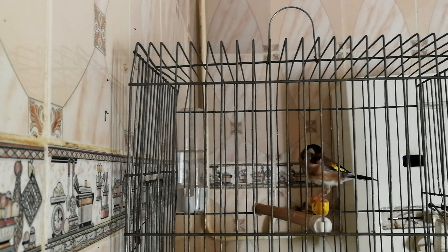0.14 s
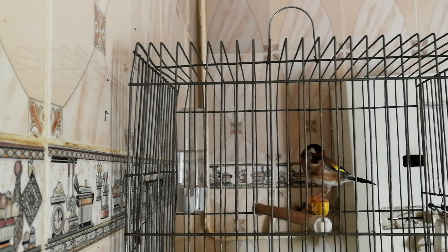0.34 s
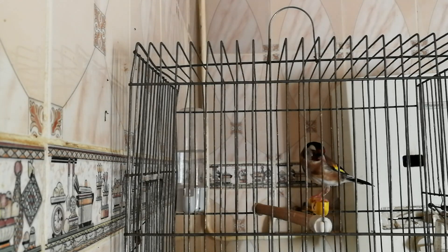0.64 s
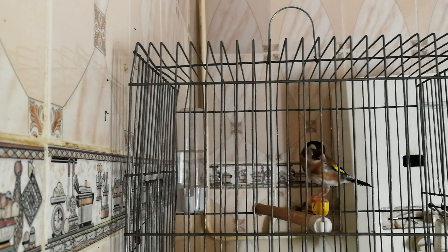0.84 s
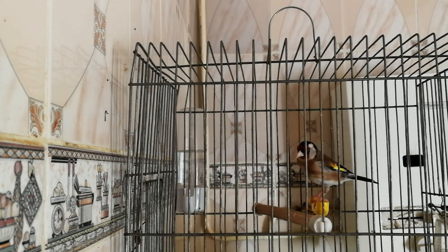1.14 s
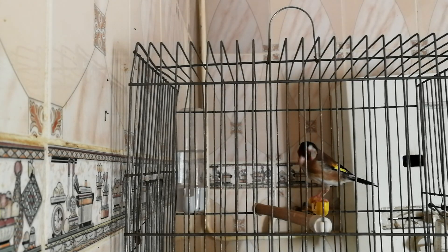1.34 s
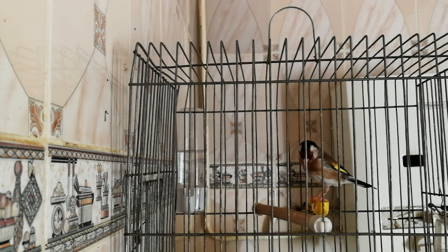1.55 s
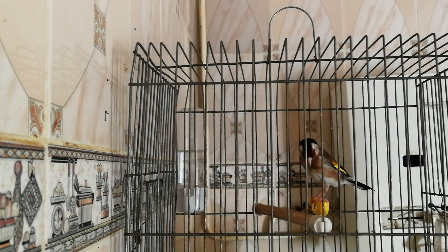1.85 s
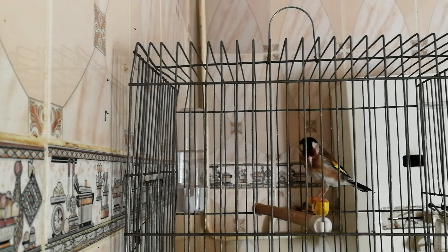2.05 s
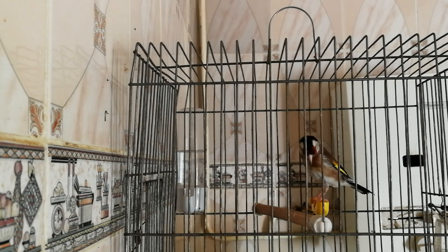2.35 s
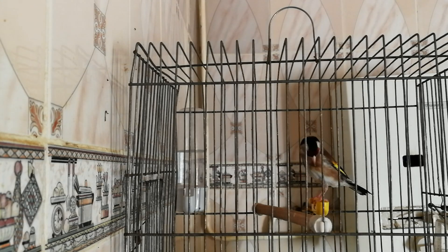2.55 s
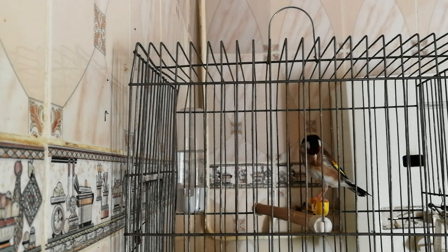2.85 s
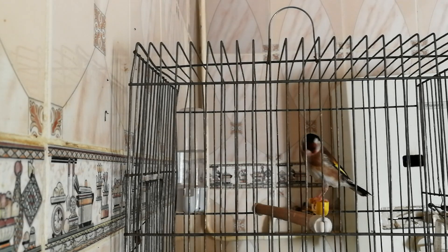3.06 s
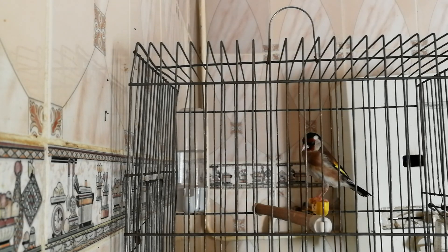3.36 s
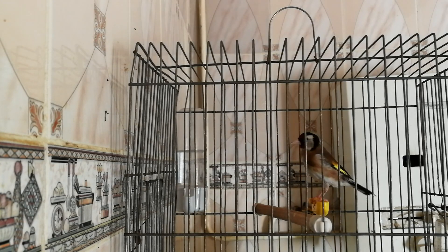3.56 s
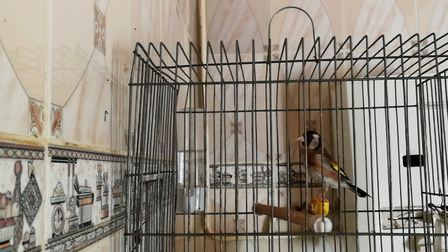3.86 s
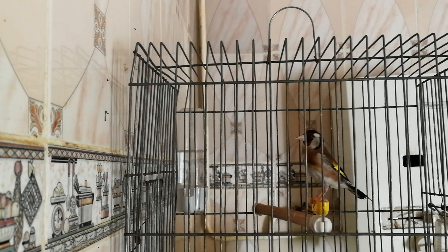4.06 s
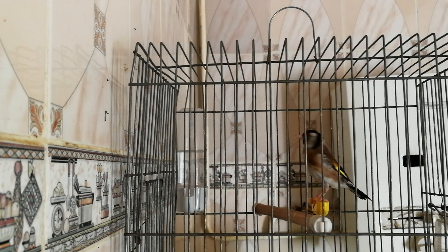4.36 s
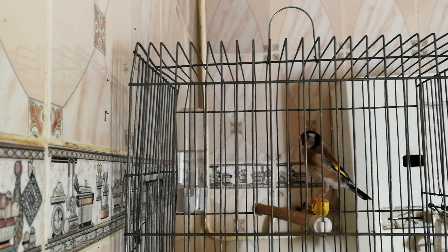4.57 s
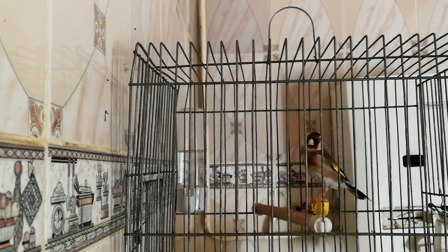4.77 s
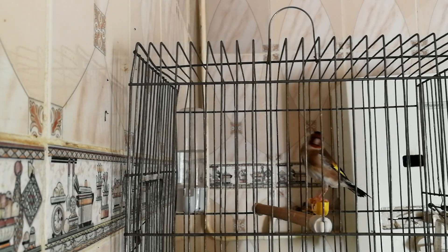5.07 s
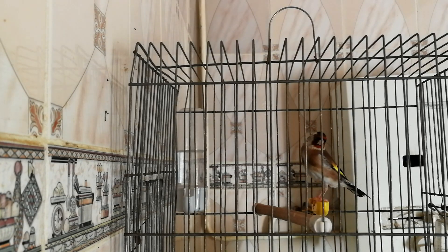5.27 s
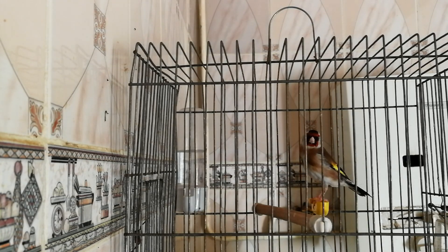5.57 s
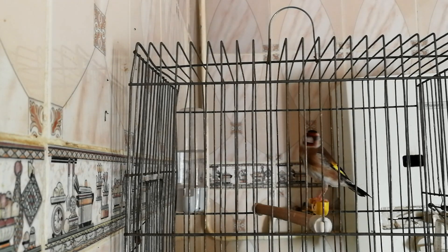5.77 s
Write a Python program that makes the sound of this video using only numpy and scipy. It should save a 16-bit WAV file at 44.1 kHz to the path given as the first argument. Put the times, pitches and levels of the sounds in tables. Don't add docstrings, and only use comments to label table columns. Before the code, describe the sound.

In a small hard tiled room, a distant second bird gives short echoing chirps from the start, strongest around one and a half and two and a half seconds. A caged finch close to the microphone adds one soft rise, then a quick loud cluster of sweeping notes midway and another pair near the end. Feathers rustle softly, claws tick faintly, and a low appliance hum and thin hiss continue underneath.

```python
import sys
import numpy as np
from scipy import signal
from scipy.fft import rfft, irfft
from scipy.io import wavfile
from scipy.ndimage import uniform_filter1d

SR = 44100
rng = np.random.default_rng(int(sys.argv[2]) if len(sys.argv) > 2 else 0)


def file_out(sig):
    cols = np.atleast_2d(sig).T
    lim = np.clip(cols, -1, 1)
    pcm = np.round(lim * 32767).astype(np.int16)
    wavfile.write(sys.argv[1], SR, pcm)


def convert_level_to_amplitude(level_db):
    exponent = np.asarray(level_db, float) / 20
    return 10 ** exponent


N = 261072

FAR_LEAD, NEAR_LEAD = 27, -9


def read(points, hz, column=1):
    table = np.transpose(points)
    return np.interp(np.log(hz + 1), np.log(table[0] + 1), table[column])


def evened(x):
    return x / np.sqrt(np.mean(x ** 2) + 1e-20)


def add(mix, s, sound):
    part = mix[..., round(s * SR):][..., :sound.shape[-1]]
    part += sound[..., :part.shape[-1]]


def resonate(x, hz, width):
    turn = np.exp(2j * np.pi * hz * np.arange(len(x)) / SR)
    r = np.exp(-np.pi * width / SR)
    return 2 * (turn * signal.lfilter([1 - r], [1, -r], x / turn)).real


def resonate_twice(x, hz, width):
    return resonate(resonate(x, hz, width), hz, width)


def whistle(hz, effort_db, overtone_db, breath_db=-27):
    partials_db = [-6, -7, -15, -22]
    # (frequency [Hz], level [dB])
    beak = [(2000, -5), (4000, 3), (5200, -1), (6500, 4.5), (7200, 4.5), (7900, -13), (9000, 5),
            (10500, -2), (12000, 1.5), (13500, -11), (16000, -30)]
    turns = np.cumsum(hz) / SR
    chance = rng.standard_normal((len(partials_db) + 1, 4096))[:, :len(hz)]
    tone = convert_level_to_amplitude(read(beak, hz)) * np.sin(2 * np.pi * turns)
    for k, db in enumerate(partials_db, start=2):
        flutter_db = 1.92 * evened(uniform_filter1d(chance[k - 1], size=60))
        audible = k * hz < SR / 2
        level = convert_level_to_amplitude(db + overtone_db + flutter_db + read(beak, k * hz))
        tone += audible * level * np.sin(2 * np.pi * k * turns)
    hiss = 1.4 * resonate_twice(np.diff(chance[0], prepend=0), 6800, 6000)
    return convert_level_to_amplitude(effort_db) * (np.sqrt(2) * tone + convert_level_to_amplitude(breath_db) * hiss)


def far_bird():
    # (time [s], level [dB], start [Hz], end [Hz], length [s])
    peeps = [
        (.001, -48.5, 3460, 4420, .019),
        (.087, -45.5, 3180, 4200, .014),
        (.54, -55.5, 4980, 3980, .014),
        (.585, -62.5, 4600, 3270, .017),
    ]
    # (time [s], level [dB], end [Hz], length [s], overtone strength [dB])
    chirps = [
        (.142, -50.5, 3010, .025, -17.5),
        (.733, -53, 3010, .024, -10.5),
        (1.566, -56, 3160, .035, -12),
        (1.596, -41, 3170, .03, -19),
        (1.992, -52, 3050, .04, -9),
        (2.551, -38.5, 2820, .014, -19),
        (3.066, -50.5, 3060, .035, -8),
        (4.147, -50, 3070, .015, -16),
    ]
    # (time [s], level [dB], overtone strength [dB])
    slides = [
        (.253, -50, -14),
        (.848, -54, -17),
        (1.691, -52, -13),
        (2.086, -49.5, -27),
        (2.182, -48, -6.5),
        (3.179, -50, -21),
    ]
    # (frequency [Hz], level [dB])
    path = [(3500, -.5), (6000, -2.5), (8000, 4), (10000, -10), (12000, -25)]
    calls = [(s, db, 2375, *rest) for s, db, *rest in chirps]
    calls += [(*peep, -17) for peep in peeps]
    calls += [(s, db, 2100, 3800, .034, over_db) for s, db, over_db in slides]
    out = np.zeros(N)
    for s, db, start_hz, end_hz, length, overtone_db in calls:
        u = np.arange(0, 1, 1 / (length * SR))
        bend = 1.095 + 350 / abs(start_hz - end_hz)
        hz = end_hz + (start_hz - end_hz) * (1 - u) ** bend
        add(out, s, whistle(hz, db, overtone_db) * np.sin(np.pi * u) ** 0.24)
    return irfft(rfft(out) * convert_level_to_amplitude(read(path, np.fft.rfftfreq(N, 1 / SR))), N)


def room(x, build, first, same, lead, livelier):
    # (frequency [Hz], 60 dB decay time [s], level [dB])
    decay = [(1000, 0.17, 7), (2500, 0.39, 0.5), (4000, 0.43, -8), (6500, 0.39, -6), (9260, 0.3, -2.5),
             (14100, 0.16, -2)]
    size = SR * 3 // 4
    echoes = rng.standard_normal((2, size))
    clumps_db = 4.5 * rng.standard_normal((2, size // 32 + 1))
    echoes *= convert_level_to_amplitude(clumps_db).repeat(32, 1)[:, :size]
    echoes[1] = same * np.roll(echoes[0], lead) + np.sqrt(1 - same ** 2) * echoes[1]
    hz, t, z = signal.stft(echoes, SR, nperseg=128)
    fall_db = 60 * t / (livelier * read(decay, hz)[:, None])
    band_db = read(decay, hz, column=2)[:, None]
    tail = signal.istft(z * convert_level_to_amplitude(band_db - fall_db), SR, nperseg=128)[1][:, :size]
    tail = tail * (1 - (1 - first) * np.exp(-np.arange(size) / SR / build))
    tail = tail / np.sqrt(0.014 * SR)
    return signal.fftconvolve(x[None], tail, axes=1)[:, :N]


def coloured(spectrum_db, same, field_db):
    a, b, c, d = rng.standard_normal((N // 128 + 5, 257, 4)).T
    left = a + 1j * b
    right = same * left + np.sqrt(1 - same ** 2) * (c + 1j * d)
    z = np.array([left, right]) * convert_level_to_amplitude(spectrum_db[..., None] + field_db)
    return signal.istft(z, nperseg=512, noverlap=384)[1][:, :N]


def rustle():
    # (loudest time [s], level [dB], 10 dB swell [s], 10 dB fade [s], share of low rustle [dB])
    stirs = [(.001, -55, .01, .11, -1.5), (.3, -61.5, .2, .07, -16), (.42, -58.5, .09, .05, -11),
             (1.22, -73, .1, .04, -2.5), (1.478, -76, .015, .12, -.5), (1.88, -79, .03, .08, -5),
             (2.106, -61, .004, .085, -24), (2.438, -75, .04, .1, -4), (2.855, -67.5, .055, .065, -2.5),
             (3.072, -63, .025, .12, -3), (3.124, -62, .012, .12, -9), (4.026, -67, .08, .11, -11),
             (4.186, -71, .1, .08, 1.5), (4.314, -72, .006, .04, -8), (4.436, -65.5, .06, .1, -14),
             (4.93, -64, .09, .1, -13), (5.05, -69, .1, .06, -5), (5.194, -70, .03, .11, 3),
             (5.306, -72.5, .02, .12, .3), (5.68, -77, .3, .1, -4), (5.815, -68.5, .12, .13, -8)]
    # (frequency [Hz], level [dB])
    high_spectrum = [(1500, -33), (3000, -4.5), (5000, -0.5), (7000, 0.5), (9500, -1), (11500, -13.5),
                     (14000, -19), (16000, -29)]
    # (frequency [Hz], level [dB])
    low_spectrum = [(500, -17), (900, -4.5), (1500, -1.5), (2500, 1.5), (4000, -2), (6000, -21)]
    hz, t = np.fft.rfftfreq(512, 1 / SR), np.arange(0, N, 32) / SR
    s, level_db, swell, fade, low_db = np.transpose(stirs)[..., None]
    power = convert_level_to_amplitude(level_db - 10 * np.maximum((s - t) / swell, (t - s) / fade)) ** 2
    still = convert_level_to_amplitude(2 * -86)
    high_level = np.sqrt(still + power.sum(0)).repeat(32)[:N]
    low_level = np.sqrt(still + (power * convert_level_to_amplitude(2 * low_db)).sum(0)).repeat(32)[:N]
    grain_db = 0.57 * evened(uniform_filter1d(rng.standard_normal(N // 128 + 5), size=3))
    high = evened(coloured(read(high_spectrum, hz), 0.1, grain_db))
    low = evened(coloured(read(low_spectrum, hz), 0.15, grain_db))
    left, right = convert_level_to_amplitude(7) * (high_level * high + low_level * low)
    return np.array([left, np.roll(right, FAR_LEAD)])


def air():
    # (frequency [Hz], level [dB per Hz])
    spectrum = [(12, -44), (20, -7.5), (59, -12.5), (104, -7.5), (162, -10.5), (260, -2.5), (307, -9.5),
                (353, -17), (689, -18.5), (910, -15.5), (1990, -23.5), (2770, -26), (3190, -34),
                (4210, -27.5), (15600, -40.5)]
    # (frequency [Hz], left-right likeness [0-1])
    likeness = [(30, .999), (150, .98), (250, .85), (500, .6), (1000, .48), (2500, .4), (6000, .25),
                (15000, .1)]
    # (frequency [Hz], left over right [dB])
    balance = [(60, 0), (200, .5), (380, 1), (700, 2.5), (1290, 5.5), (2380, 2.5), (4400, -1), (8000, 1)]
    hz = np.fft.rfftfreq(N, 1 / SR)
    a, b, c, d = rng.standard_normal((len(hz), 4)).T
    same, half = read(likeness, hz), convert_level_to_amplitude(read(balance, hz) / 2)
    lag = np.exp(-2j * np.pi * hz * FAR_LEAD / SR * np.clip((hz - 300) / 300, 0, 1))
    left = a + 1j * b
    right = same * lag * left + np.sqrt(1 - same ** 2) * (c + 1j * d)
    z = np.array([left * half, right / half]) * convert_level_to_amplitude(read(spectrum, hz))
    above = irfft(z * (hz > 450), N)
    return convert_level_to_amplitude(-68.5) * irfft(z, N) / np.sqrt(np.mean(above.mean(0) ** 2))


def hum():
    # (frequency [Hz], width [Hz], level [dB])
    resonances = [(84, 14, -81), (165, 11, -80), (198.15, 5.1, -65.5), (245.8, 7.2, -68),
                  (276.05, 12.6, -66.5), (296.9, 14, -73.5), (348.5, 8, -81), (391.5, 6.8, -79.5),
                  (5020, 19, -87)]
    noise = rng.standard_normal((len(resonances) + 1, N))
    waver = evened(uniform_filter1d(uniform_filter1d(noise[-1], size=4000), size=4000))
    motor_hz = 117.9 + 0.57 * waver
    out = np.sqrt(2) * convert_level_to_amplitude(-63) * np.sin(2 * np.pi * np.cumsum(motor_hz) / SR)
    for n, (hz, width, db) in zip(noise, resonances):
        out += convert_level_to_amplitude(db) * evened(resonate_twice(n, hz, width))
    return out


def syllable(db, pitch, stretch, overtone_db, from_hz, to_hz, glide, length, crest, rounded, grow_db):
    u = np.arange(0, 1, 1 / (length * stretch * SR))
    hz = to_hz + (from_hz - to_hz) * np.exp(-(u * length / glide) ** 1.6)
    skew = np.log(.5) / np.log(crest)
    swell = abs(np.sin(np.pi * u ** skew)) ** rounded
    return swell * whistle(hz * pitch, db, overtone_db + grow_db * u)


def finch():
    rise = dict(from_hz=2280, to_hz=3390, glide=.0078, length=.028, crest=.62, rounded=.6, grow_db=7.)
    grace = dict(from_hz=3090, to_hz=3800, glide=.002, length=.0035, crest=.35, rounded=.8, grow_db=3.)
    fall = dict(from_hz=5900, to_hz=5410, glide=.0095, length=.031, crest=.42, rounded=1.1, grow_db=4.)
    second_voice = dict(from_hz=6330, to_hz=6430, glide=.006, length=.022, crest=.4, rounded=.7, grow_db=4.)
    dive = dict(from_hz=4000, to_hz=2600, glide=.004, length=.0085, crest=.5, rounded=.4, grow_db=2.5)
    sweep = dict(from_hz=2800, to_hz=5000, glide=.0175, length=.036, crest=.53, rounded=1.15, grow_db=3.)
    # (time [s], level [dB], pitch [factor], length [factor], overtone strength [dB])
    rises = [
        (1.2425, -33, 1.004, .84, -11.5),
        (3.414, -29.5, 1.006, 1.15, -12),
        (3.5955, -28, .999, 1.1, -17),
        (4.645, -32.5, .97, .95, -12),
    ]
    graces = [
        (3.496, -50, 1.001, 1.3, -22),
    ]
    hooks = [
        (3.5005, -21, 1.01, 1.06, -21),
        (4.7805, -23, .98, .88, -17),
    ]
    two_voiced = [
        (3.7005, -27, 1.001, 1.01, -4.5),
        (3.705, -38, 1.001, 1.01, -16),
    ]
    out = np.zeros(N)
    for shape, notes in ((rise, rises), (grace, graces), (fall, two_voiced[:1]), (second_voice, two_voiced[1:])):
        for s, *note in notes:
            add(out, s, syllable(*note, **shape))
    for s, db, pitch, stretch, overtone_db in hooks:
        add(out, s, syllable(db - 14, pitch, stretch, overtone_db + 6, **dive))
        add(out, s + .0055 * stretch, syllable(db, pitch, stretch, overtone_db, **sweep))
    return out


def taps(events):
    out, t = np.zeros(N), np.arange(4000) / SR
    for s, db, hz, width, length in events:
        scrape = rng.standard_normal(len(t)) * np.exp(-t / length)
        add(out, s, convert_level_to_amplitude(db) * evened(resonate_twice(scrape, hz, width)))
    return out


def perch_ticks():
    # (time [s], level [dB], centre [Hz], width [Hz], scrape length [s])
    ticks = [
        (2.105, -70, 7800, 5940, .004),
        (3.122, -70.5, 8800, 5000, 0.0075),
        (3.125, -62, 4500, 2500, .002),
        (4.312, -89, 8500, 4000, .004),
        (4.405, -78, 9000, 6000, .004),
        (5.187, -83, 8350, 5000, .005),
        (5.308, -83, 8900, 4000, 0.0058),
        (5.618, -84, 9100, 3000, 0.0046),
        (5.822, -74, 6000, 3000, .004),
    ]
    return taps(ticks)


def far_knocks():
    # (time [s], level [dB], centre [Hz], width [Hz], scrape length [s])
    knocks = [
        (4.160, -72, 1360, 260, 0.0084),
        (4.152, -71, 2000, 1100, 0.0076),
        (5.734, -66.5, 1440, 140, 0.03),
        (5.734, -68, 1050, 600, 0.003),
    ]
    return taps(knocks)


def direct(x):
    # (frequency [Hz], left over right [dB])
    shade = [(2000, -15.5), (3400, 2.5), (4400, -.5), (5500, 8), (9000, 21), (11500, 19.5), (15000, 1)]
    half = convert_level_to_amplitude(read(shade, np.fft.rfftfreq(N, 1 / SR)) / 2)
    left, right = irfft(rfft(x) * half, N), irfft(rfft(x) / half, N)
    return np.array([left, np.roll(right, NEAR_LEAD)])


def scene():
    far = far_bird() + far_knocks()
    near = finch() + perch_ticks()
    far_echoes = room(far, build=.045, first=0.1, same=0.29, lead=FAR_LEAD, livelier=0.93)
    near_echoes = room(near, build=.001, first=.05, same=0.11, lead=NEAR_LEAD, livelier=0.88)
    birds = convert_level_to_amplitude(-1.5) * direct(near) + convert_level_to_amplitude(-1.0) * near_echoes + convert_level_to_amplitude(7.5) * far_echoes
    return birds + air() + hum() + rustle()


def top_cut(x):
    return signal.sosfilt(signal.butter(12, 15740, fs=SR, output="sos"), x)


def record(dry):
    limited = signal.oaconvolve(dry, signal.firwin(255, 15700, fs=SR)[None], "same")
    return top_cut(limited)


dry = scene()
out = record(dry)
file_out(out)
```